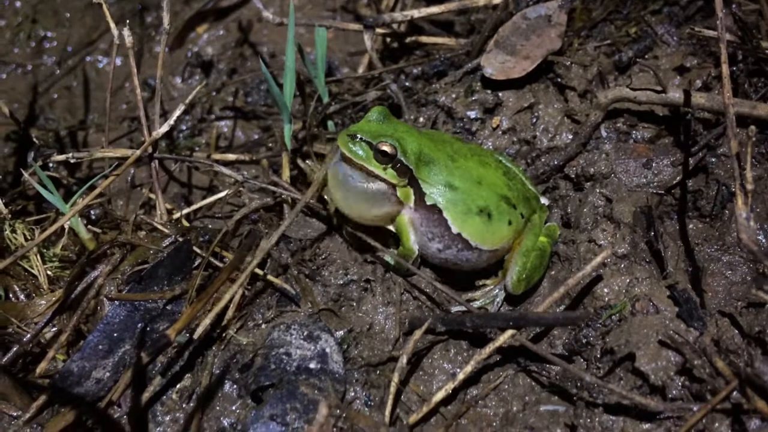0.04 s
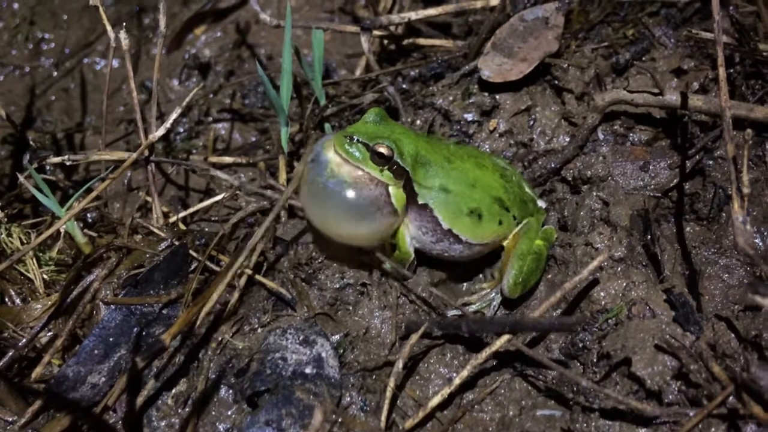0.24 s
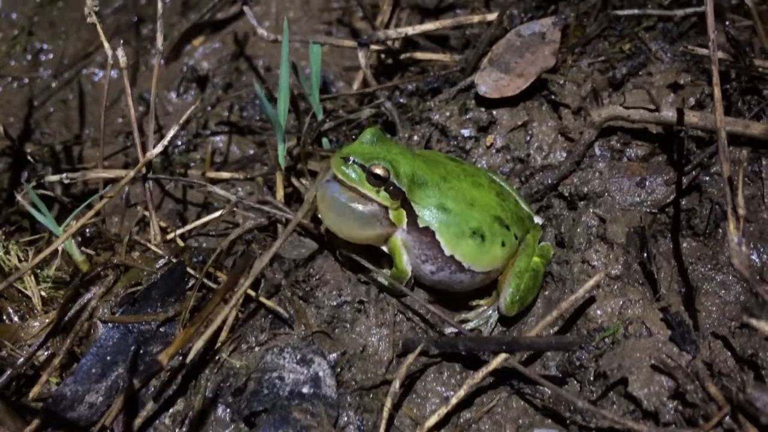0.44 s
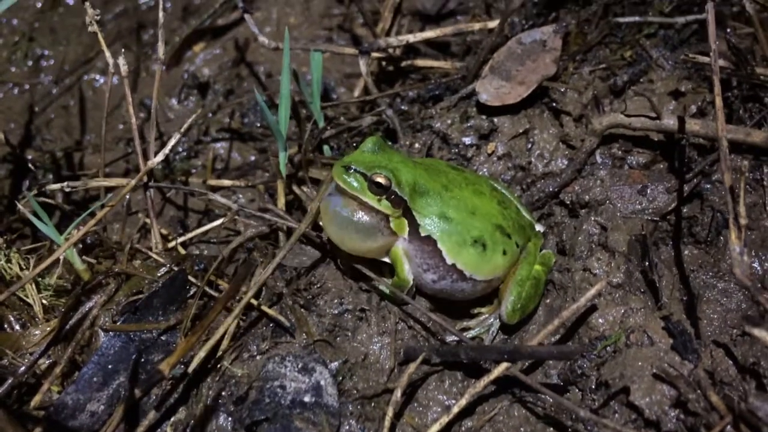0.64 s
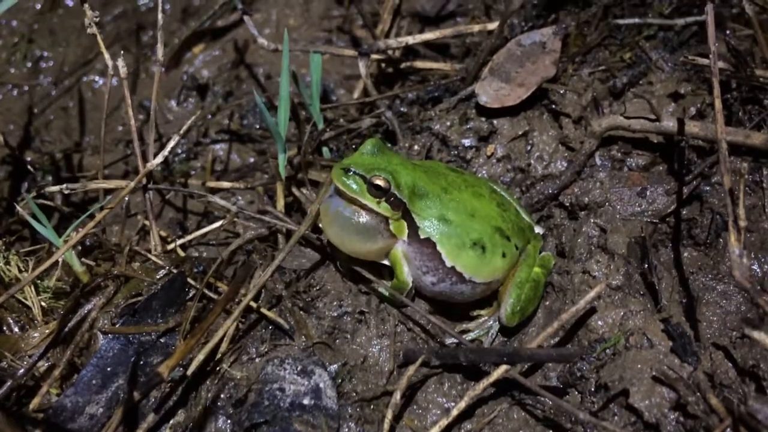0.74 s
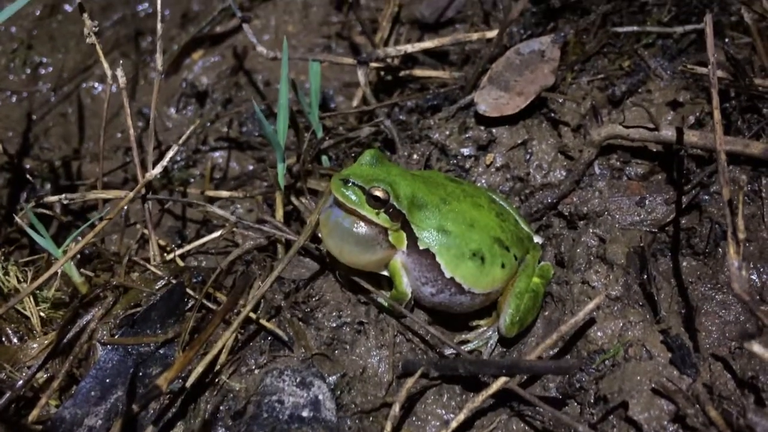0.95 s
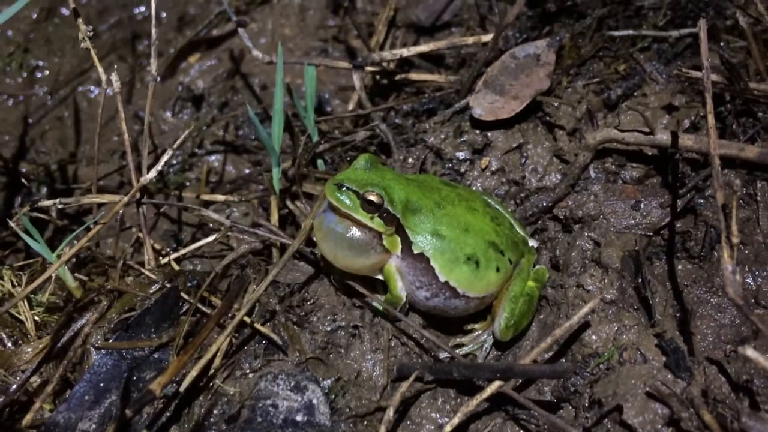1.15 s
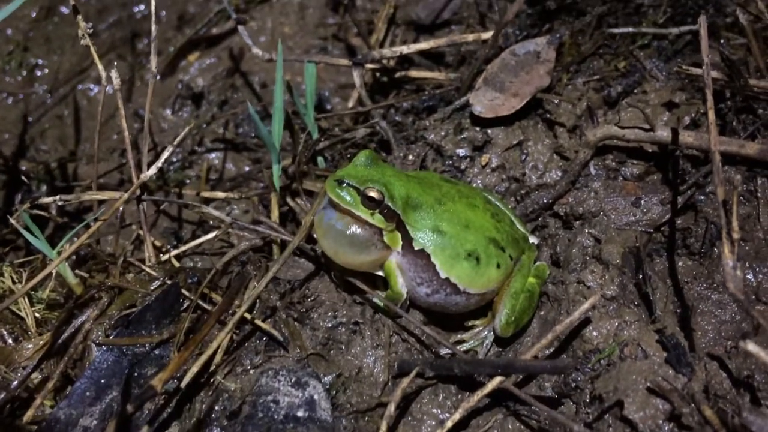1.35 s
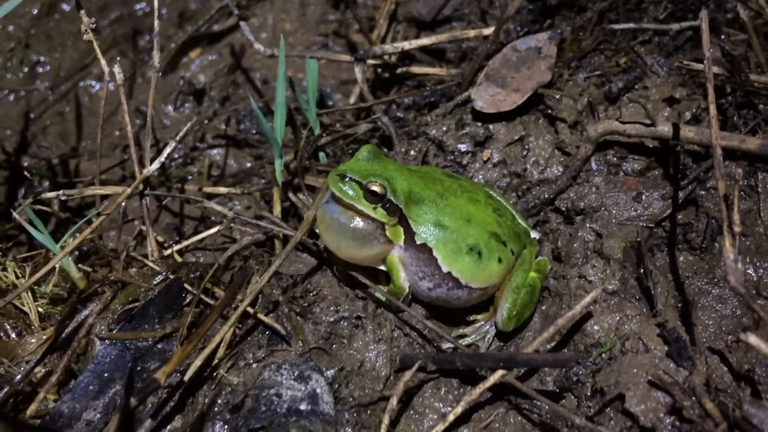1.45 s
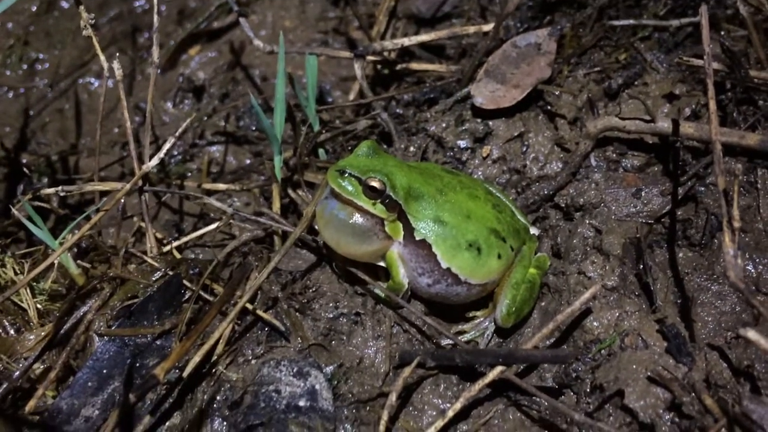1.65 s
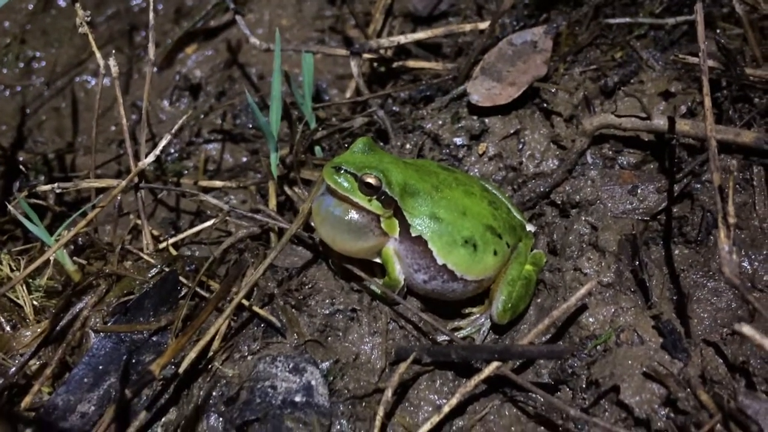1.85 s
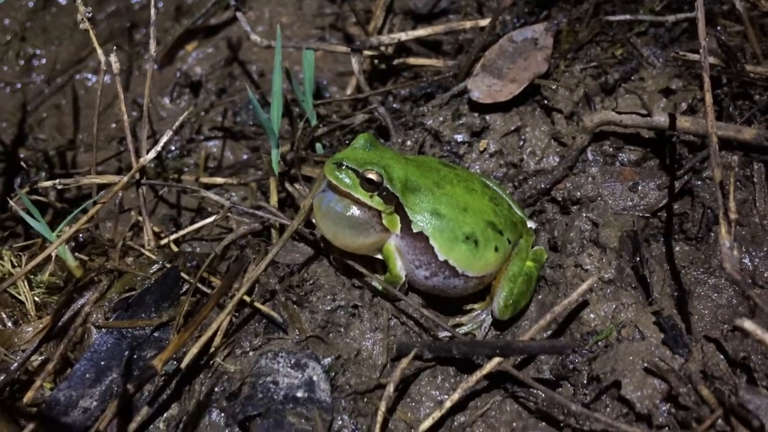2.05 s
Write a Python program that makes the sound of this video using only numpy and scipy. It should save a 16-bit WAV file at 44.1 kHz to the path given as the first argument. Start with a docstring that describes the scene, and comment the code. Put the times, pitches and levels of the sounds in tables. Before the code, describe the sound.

One close, rasping tree frog croak, with other frogs calling farther off.

```python
"""A tree frog up close

A tree frog on wet ground gives one harsh croak, so close that the microphone overloads.
The croak is a quick row of pulses. Each rings the vocal sac (the frog's throat pouch), and the
pitch rises. Neighbours call the same way farther off, over a blurred distant chorus and a
faint hiss. This whole background gets louder after the croak."""
import sys
import numpy as np
from scipy import signal
from scipy.fft import rfft, irfft, next_fast_len
from scipy.io import wavfile
from scipy.ndimage import map_coordinates

SR = 44100
rng = np.random.default_rng(int(sys.argv[2]) if len(sys.argv) > 2 else 0)


def file_out(sig):
    """Save sig as 16-bit WAV at sys.argv[1]."""
    # one column per channel
    cols = np.atleast_2d(sig).T
    # limit, then scale
    lim = np.clip(cols, -1, 1)
    pcm = np.round(lim * 32767).astype(np.int16)
    wavfile.write(sys.argv[1], SR, pcm)


N = 92610  # 2.1 seconds


def amp(db):
    """Turn decibels into a number to multiply by."""
    return 10 ** (np.asarray(db) / 20)


def unit(x):
    """Scale a sound so that its average strength (rms) is 1."""
    return x / np.sqrt(np.mean(x ** 2) + 1e-20)


def wobble(rate):
    """A smooth random curve through `rate` random points a second."""
    points = rng.standard_normal(int(N * rate / SR) + 4)
    return map_coordinates(points, [np.arange(N) * rate / SR])


def coloured(x, tone):
    """Make some pitches louder and others softer, following rows of (pitch_hz, level_db)."""
    size = next_fast_len(N + 8192)
    hz, db = np.transpose(tone)
    gain = amp(np.interp(np.log(np.fft.rfftfreq(size, 1 / SR) + 1), np.log(hz), db))
    return irfft(rfft(x, size) * gain, size)[:N]


def echoes(x, fade_s):
    """A blur of tiny echoes that falls by 60 dB in fade_s seconds."""
    t = np.arange(SR // 4) / SR
    tail = rng.standard_normal(len(t)) * np.exp(-np.log(1000) * t / fade_s)
    return signal.fftconvolve(x, tail / np.linalg.norm(tail))[:len(x)]


def pulses(t, rate, pitch, ring_db, hold_ms, knock_db, knock_tone, follow, jitter_ms, scatter_db):
    """One call, pulse by pulse: the sac's ring, its loudness outline and the throat's knock."""
    attack_ms, decay_ms, knock_lag_ms = 0.97, 1.17, 1.4
    sag_hz_per_ms = 6.3  # the ring sinks in pitch within each pulse
    ring, outline, knock = np.zeros((3, N + SR))
    pulse_count = np.cumsum(rate) / SR
    width = SR // 50  # samples set aside for one pulse
    lead = width // 4
    one_knock = coloured(signal.unit_impulse(N, width), knock_tone)[:2 * width]
    chance = rng.standard_normal((64, 4))  # no two pulses are quite alike
    for k, (late, louder, detune, phase) in zip(range(int(pulse_count[-1]) + 1), chance):
        time_s = np.interp(k, pulse_count, t)
        now = lambda curve: np.interp(time_s, t, curve)
        start = (time_s + late * jitter_ms / 1000) * SR
        span = slice(int(start) - lead, int(start) - lead + width)
        ms = (np.arange(width) - lead - start % 1) * 1000 / SR  # time since the pulse began
        rise = 1 - np.exp(-np.maximum(ms, 0) / attack_ms)
        fall = 1 / np.sqrt(1 + np.exp(2 * (ms - now(hold_ms)) / decay_ms))
        shape = rise * fall * amp(now(ring_db) + scatter_db * louder)
        outline[span] += shape
        hz = now(pitch) * (1 + 0.004 * detune) - sag_hz_per_ms * (ms / 2 - now(hold_ms))
        ring[span] += shape * np.sin(2 * np.pi * hz * ms / 1000 + 0.2 * phase)
        # The knock's tone rises with the sac's pitch; `follow` sets how closely.
        speed = (now(pitch) / 2600) ** follow
        tuned_knock = map_coordinates(one_knock, [width + speed * (ms - knock_lag_ms) * SR / 1000])
        knock[span] += amp(now(knock_db) + scatter_db * louder) * tuned_knock
    return ring[:N], outline[:N], knock[:N]


def hiss(level_db):
    """A faint background noise, strongest in the bass."""
    # Tone of the hiss: pitch_hz, level_db
    hiss_tone = [(25, -7), (100, 3.5), (200, -2.5), (600, -8.5), (2000, -19), (9000, -22), (15000, -26)]
    return amp(level_db) * unit(coloured(rng.standard_normal(N), hiss_tone))


def chorus(level_db=-37.5, sway_db=2.5, flutter_db=1):
    """Many distant frogs blur into two fluttering bands of noise, one low and one high."""
    # Tone of the distant frogs together: pitch_hz, level_db
    chorus_tone = [(400, -59), (750, -37), (900, -25.5), (1070, -3), (1270, -3), (1550, -13.5), (1900, -23),
                   (2250, -11.5), (2550, 5.5), (2720, 4), (3050, -16.5), (3500, -13.5), (4200, -24.5),
                   (5400, -29.5), (6900, -27), (7500, -54), (8600, -41), (9200, -72)]
    loudness = amp(sway_db * wobble(4.5) + flutter_db * wobble(260))
    return amp(level_db) * unit(coloured(loudness * rng.standard_normal(N), chorus_tone))


def neighbours():
    """Frogs farther off: each call gets higher, faster and louder, then fades among its echoes."""
    # The neighbours' calls: start_s, length_s, final_pitch_hz, final_pulses_per_s, level_db
    calls = [(0.031, 0.17, 3080, 145, -30.5), (0.071, 0.18, 2770, 130, -26), (.41, 0.23, 3036, 143, -30),
             (.49, 0.16, 2672, 110, -26), (.69, 0.072, 2800, 128, -23.5), (.743, 0.047, 2817, 128, -22.5),
             (.78, 0.17, 3076, 170, -26.5), (.79, 0.11, 2570, 180, -30.5), (.88, 0.13, 2832, 140, -22),
             (0.924, 0.15, 2650, 116, -23.5), (1.114, 0.17, 2707, 124, -24.5),
             (1.16, 0.14, 3064, 146, -24.5), (1.25, .13, 2860, 136, -25.5), (1.36, 0.15, 2675, 117, -22),
             (1.497, 0.076, 2585, 130, -23), (1.519, .16, 2950, 130, -21.5),
             (1.616, 0.13, 2970, 138, -24.5), (1.776, 0.12, 2657, 140, -24), (1.921, .15, 3154, 160, -28.5),
             (1.926, 0.18, 2820, 120, -23.5), (2.028, 0.086, 2934, 150, -24.5)]
    # Tone of a neighbour's knock as heard, with a thin bright edge near 7 kHz: pitch_hz, level_db
    knock_tone = [(100, -48), (700, -44.5), (880, -22), (1080, -2), (1250, -1), (1550, -4), (1900, -17.5),
                  (2400, -27.5), (3300, -27), (4200, -16), (5400, -36), (6900, -21), (7500, -48.5),
                  (15000, -83)]
    # Extra colour shared by all the neighbours' knocks: pitch_hz, level_db
    shared_tone = [(600, -29.5), (850, -14.5), (1020, 0), (7000, -1.5), (7600, -11.5), (9000, -12)]
    rise_s, swell_db, fade_s, fade_db = 0.04, 6.5, 0.032, 11.5
    out = np.zeros(N)
    for start_s, length_s, final_hz, final_rate, level_db in calls:
        t = np.arange(int(length_s * SR)) / SR
        slack = np.exp(-t / rise_s)  # 1 at first, nearing 0 as the call gets going
        fading_db = level_db - fade_db * np.exp((t - length_s) / fade_s)
        ring, outline, knock = pulses(
            start_s + t, rate=final_rate * (1 - 0.12 * slack), pitch=final_hz * (1 - 0.095 * slack),
            ring_db=fading_db - swell_db * slack, hold_ms=np.full(len(t), 2.09),
            knock_db=fading_db, knock_tone=knock_tone, follow=0.51, jitter_ms=0.15, scatter_db=1)
        overtone = 4 * ring ** 3 / (outline ** 2 + 1e-12) - 3 * ring  # three times the ring's pitch
        voice = ring + amp(-48) * overtone + amp(22.5) * coloured(knock, shared_tone)
        out += voice + echoes(voice, fade_s=0.1)
    return out


def near_frog():
    """The close croak: a ringing sac, a knocking throat, rasping air and a low beat."""
    # How the croak changes: time_s, pulses_per_s, pitch_hz, ring_db, hold_ms, knock_db
    croak = [(0.2379, 119, 2280, -13, 1, -3), (.2469, 102, 2502, -5, 1.7, -1.5),
             (0.255, 111, 2460, -4, 1.9, 2), (0.2751, 122, 2677, -1, 2.6, -3),
             (0.2963, 125, 2717, 1, 3.1, -0.5), (0.326, 126.8, 2750, 6, 1.98, 3),
             (.361, 129.2, 2903, 3.5, 2.52, -0.5), (0.383, 129.2, 2770, 2.5, 1.4, -3),
             (0.391, 125, 2866, -4, 1.3, -4)]
    # Tone that the throat adds to each pulse: pitch_hz, level_db
    knock_tone = [(100, -62), (650, -59), (880, -17), (1130, 2.5), (1300, 2.5), (1500, 1), (1780, -15),
                  (2200, -14.5), (2800, -23.5), (3400, -18.5), (4100, -10.5), (5000, -33.5), (6300, -19.5),
                  (7500, -39), (15000, -57.5)]
    # Tone of the rasping air: pitch_hz, level_db
    rasp_tone = [(300, -32), (800, -12), (1200, 10.5), (2000, 3.5), (3400, 4), (4400, -2.5), (5400, -14.5),
                 (7000, -10), (10000, -25), (15000, -41)]
    # Weak sputters as the throat opens and closes: time_s, level_db
    sputters = [(.232, -37.5), (0.402, -32), (0.4034, -37.5)]
    t = np.arange(N) / SR
    times, *columns = np.transpose(croak)
    croak_t = np.arange(times[0], times[-1] + 0.003, 1 / SR)
    curves = [np.interp(croak_t, times, column) for column in columns]
    ring, outline, knock = pulses(
        croak_t, *curves, knock_tone, follow=0.74, jitter_ms=0.01, scatter_db=0.96)
    # Air rasps within each pulse and each sputter.
    air = amp(-20.5) * outline ** 0.6
    sputter_width_s = 0.002
    for time_s, level_db in sputters:
        air += amp(level_db) * np.exp(-((t - time_s) / sputter_width_s) ** 2 / 2)
    rasp = air * unit(coloured(rng.standard_normal(N), rasp_tone))
    # A brief higher ring sounds as the sac first fills.
    pop_s, pop_hz, pop_width_s = 0.239, 3190, 0.00087
    pop_shape = np.exp(-((t - pop_s) / pop_width_s) ** 2 / 2)
    pop = pop_shape * np.sin(2 * np.pi * pop_hz * (t - pop_s))
    voice = ring + amp(17.5) * knock + rasp + amp(-17) * pop
    # The strongest pulses add a low beat.
    beat_hz = 124
    band_hz = [beat_hz / np.sqrt(2), beat_hz * np.sqrt(2)]
    beat = signal.sosfilt(signal.butter(1, band_hz, 'band', fs=SR, output='sos'), outline ** 3.6)
    ground_echoes = echoes(voice, fade_s=0.05)  # sound bounces off the ground and twigs
    return voice + amp(-17) * ground_echoes + amp(-31) * beat


def scene():
    """The near frog in front of a background that steps up after its croak."""
    step_s, step_length_s, before_db = 0.678, 0.04, -8
    before = np.interp(np.arange(N) / SR, [step_s, step_s + step_length_s], [1, 0])
    faint_hiss = hiss(-72 - 7 * before)  # the hiss takes a bigger step than the rest
    croak = near_frog()
    background = amp(before_db * before) * (neighbours() + chorus() + faint_hiss)
    return (croak + background)[None]


def record(dry, ceiling=0.7, hardness=4.2, top_hz=15400):
    """The overloaded microphone rounds off the loudest peaks; nothing above top_hz gets through."""
    rounded = dry / (1 + np.abs(dry / ceiling) ** hardness) ** (1 / hardness)
    size = next_fast_len(N + SR // 2)
    passes = np.fft.rfftfreq(size, 1 / SR) < top_hz
    return irfft(rfft(rounded, size) * passes, size)[..., :N]


dry = scene()
out = record(dry)
file_out(out)
```